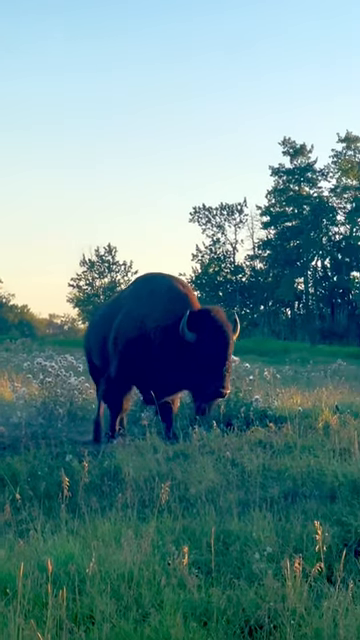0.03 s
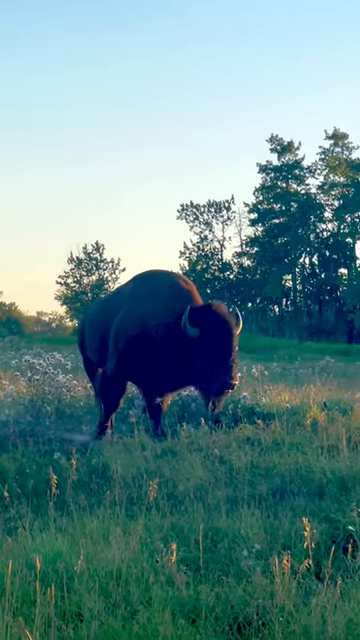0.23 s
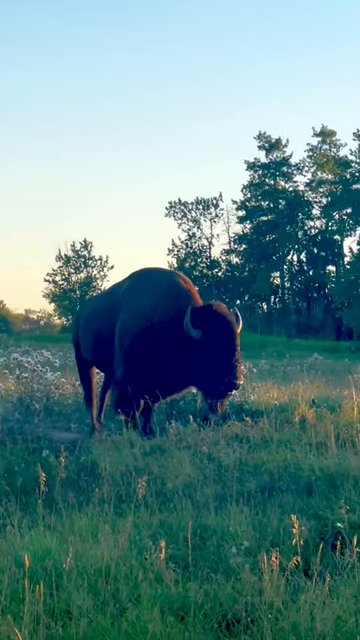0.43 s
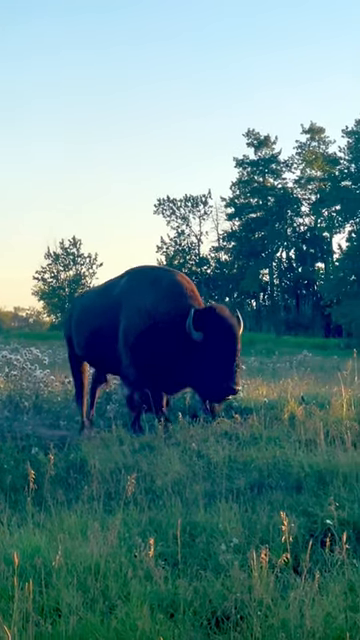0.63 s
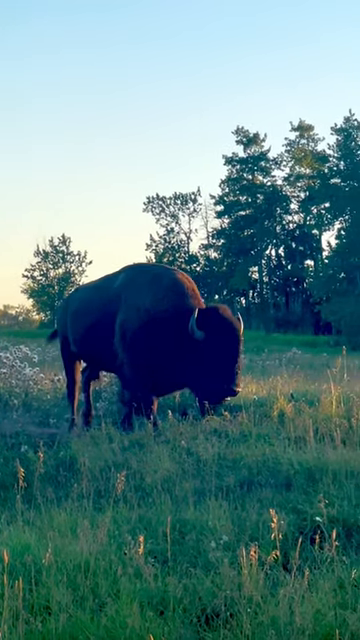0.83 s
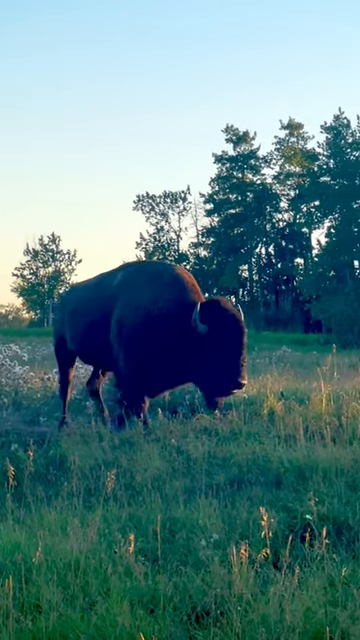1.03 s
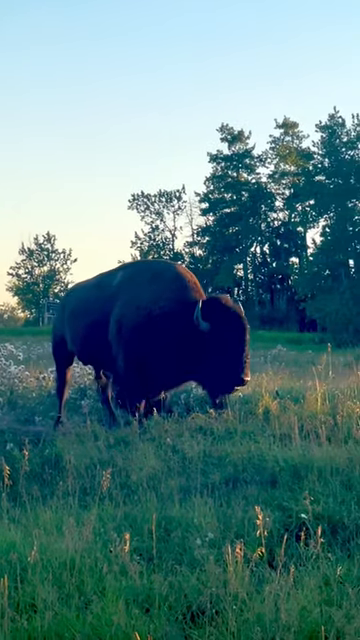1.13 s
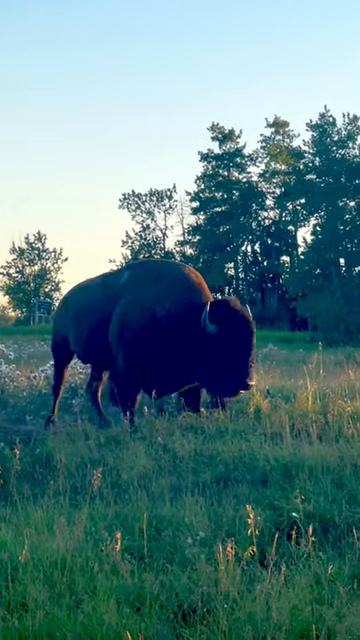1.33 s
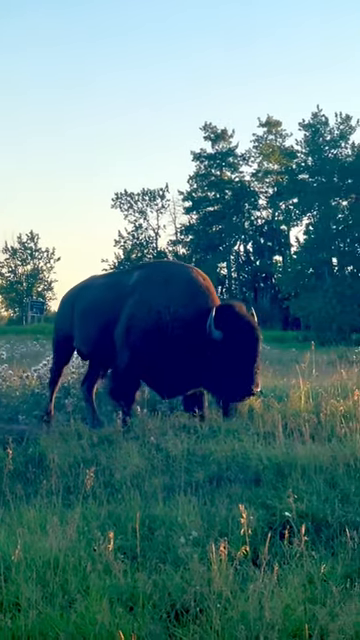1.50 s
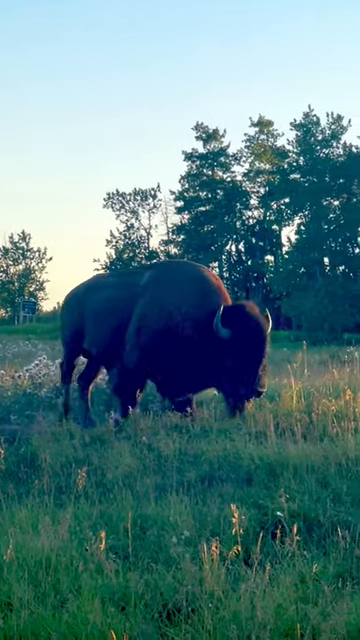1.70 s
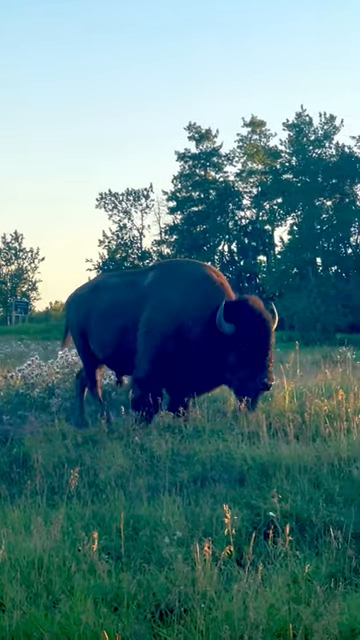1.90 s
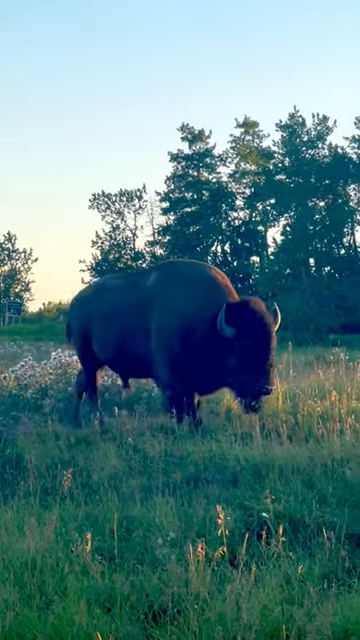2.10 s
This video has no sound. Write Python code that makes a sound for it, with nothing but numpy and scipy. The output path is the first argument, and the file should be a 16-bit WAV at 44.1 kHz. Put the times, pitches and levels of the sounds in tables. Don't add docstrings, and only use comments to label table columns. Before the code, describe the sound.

A bison bellows close by, a deep, rough, throaty growl pulsing fast in an open meadow.

```python
import sys
import numpy as np
from scipy import signal
from scipy.fft import rfft, irfft, next_fast_len
from scipy.io import wavfile
from scipy.ndimage import map_coordinates

SR = 44100
rng = np.random.default_rng(int(sys.argv[2]) if len(sys.argv) > 2 else 0)


def store_wav(level_fs):
    pcm = np.round(np.clip(np.atleast_2d(level_fs), -1, 1) * 32767)
    wavfile.write(sys.argv[1], SR, pcm.T.astype(np.int16))


def natural_amplitude(level_db):
    exponent = np.asarray(level_db, float) / 20
    return 10 ** exponent


N = 94815

# frequency in Hz, level in dB per Hz.
HUM_HZ_DB = [(25, -28), (60, -3), (160, -5), (520, -10.5), (980, -17.5), (2000, -29.5), (3000, -46.5),
             (8000, -61)]
# frequency in Hz, level in dB.
RUMBLE_HZ_DB = [(20, -53.5), (45, 10.5), (95, 3), (160, 7.5), (260, -36.5)]
# time in seconds, buzz in dB.
BUZZ_S_DB = [(0, -67), (.06, -71.5), (.17, -59), (.25, -68), (.37, -59.5), (.47, -69), (.6, -55.5),
             (.68, -68.5), (1.1, -75), (1.3, -66), (1.45, -70), (1.62, -85.5), (1.8, -79), (1.91, -66.5),
             (1.98, -77), (2.12, -59), (2.15, -58)]
# frequency in Hz, level in dB.
WING_HZ_DB = [(3000, -43.5), (6000, -38.5), (7800, -24), (8500, -4), (9300, -13), (10400, -2),
              (11300, -11.5), (12200, -24.5)]
# centre in Hz, width in Hz, level in dB.
CRICKET_WING = [(3880, 460, -8), (7100, 710, -11), (2800, 220, -16)]
# time in seconds, scrapes done.
SCRAPES_S_COUNT = [(.005, 0), (.25, 6), (1.59, 37), (1.96, 45), (2.195, 50)]
# time in seconds, level in dB.
CRICKET_S_DB = [(0, -79), (.4, -80), (1.5, -84), (2.15, -85)]
# centre in seconds, length in seconds, level in dB.
SWISHES = [
    (1.673, 0.0079, -75),
    (1.91, 0.014, -79.5),
    (2.143, 0.052, -65),
]
# frequency in Hz, level in dB.
GRASS_HZ_DB = [(1500, -19), (3000, 1), (4500, 3.5), (6000, 1), (8000, -28), (12000, -35)]

# time in seconds, cycles done.
CYCLES_S_COUNT = [(.177, 0), (.2877, 3), (.414, 7), (.5576, 11), (.778, 17), (1.042, 24), (1.195, 28),
                  (1.359, 32), (1.49, 35)]
# time in seconds, level in dB.
EFFORT_S_DB = [
    (.16, -76),
    (.2, -43.5),
    (.29, -53),
    (.33, -33.5),
    (.42, -29),
    (.6, -31.5),
    (1.1, -34),
    (1.38, -38.5),
    (1.5, -60.5),
]
# time in seconds, slap sharpness in dB, air in dB.
EDGE_S_DB = [(.17, -3, -37), (.25, -15, -40), (.29, 4.5, -2.5), (.35, -2.5, 6), (.41, -4, 6.5), (.5, -2, 4),
             (.8, -0.5, 0), (.98, -6, 2.3), (1.15, -2, -3), (1.45, -6, 6)]
ACCENTS_DB = {0: 7.5, 4: 8.3, 5: -4, 6: -10.5, 7: 3.6, 8: 6.6, 9: 2.1, 10: -3.5, 11: 0.57, 12: 1.3, 17: 6.5,
              19: -1.2, 20: 1.4, 21: 9, 22: 5, 23: -10, 24: 8.5, 25: 4.3, 26: 5.3, 29: -5, 30: 3, 32: 3.5,
              33: -15, 34: -22}
THUMPS_DB = {4: 2.2, 5: -0.5, 6: 2.1, 7: -3, 8: .3, 9: 0.58, 10: 3.6, 11: 2.3, 12: 0.97, 13: 4.3, 14: .3,
             15: -1.5, 16: -6, 17: 2.5, 18: -1.5, 19: .3, 20: -.3, 21: 6.4, 22: .3, 23: 2.3, 24: .3, 25: .3,
             26: .3, 27: 1.6, 28: 1.5, 29: -1.5, 30: 1.5, 31: -1.3, 32: 0.92, 33: -1.5}
GUSTS_DB = {4: -5, 5: 1.5, 6: 2, 7: 4, 9: -4, 10: -9, 11: 1.5, 14: 1.5, 15: 3, 16: -1.5, 19: -1, 20: -4, 22:
            3, 23: 2.5, 24: -3, 26: 2.5, 27: -3, 28: -4, 29: -4, 32: 2.5}
# time in seconds, level in dB.
ECHO_S_DB = [(.85, -1), (.95, -13.5), (1.2, -2), (1.45, -4)]
# cycle, shift in cycles, level in dB.
ODD_ECHOES = [(4, 0, -6), (5, -.02, 3), (6, -.25, 2), (7, -.1, 0), (8, -.09, 3), (9, .04, 2), (10, 0, -9),
              (11, -.04, 4), (13, 0, 2), (14, -.1, -3), (15, 0, 3), (16, -.1, -4), (17, -.05, 7),
              (19, .07, 0), (28, -.1, 2), (29, -.06, 9), (32, 0, 2)]
# time in seconds, centre in Hz.
CHEST_S_HZ = [(.2, 156.4), (.33, 158.7), (.42, 193.7), (.55, 200.5), (.65, 206.5), (.8, 194.2),
              (1.0, 194.5), (1.2, 174.3), (1.45, 180)]
# centre in Hz, width in Hz, level in dB.
FLANK_MODES = [(58, 25.6, -13.5), (85, 71, -19), (127.7, 16.5, -7)]
# time in seconds, centre in Hz, level in dB.
NOSE_S_HZ_DB = [(.3, 456, 0), (.55, 460, -1), (.7, 473.5, 6), (1.0, 472.6, 3.5), (1.15, 496, 5.5),
                (1.45, 515, 0)]
# first Hz, last Hz, width in Hz, first dB, last dB.
THROAT_MODES = [(678.4, 780, 51, -1.5, -7), (993, 960, 77, 2, -2.5), (1210, 1224, 64.4, 1.4, 2),
                (1531, 1593, 105, -3.5, -4), (1820, 3200, 62, -7.5, -21), (2064, 890, 60, -10, -30.5),
                (2620, 940, 100, -43.5, -25.5)]
# frequency in Hz, level in dB.
AIR_HZ_DB = [(1500, 15), (2500, -2.5), (3500, -2), (5200, -5), (7000, -19), (9000, -6), (10500, -2),
             (13000, -30)]
# time in seconds, share of air in puffs.
PULSED_S_SHARE = [(.29, 1.2), (.33, .2), (.45, .3), (.6, .5), (1.2, .55), (1.3, .2)]
# centre in Hz, width in Hz, level in dB.
PARTING_MODES = [(373, 110, 2.5), (570, 200, 1.5), (970, 110, -4)]

# frequency in Hz, left lead in radians.
PHASE_HZ_RAD = [(0, 0), (600, -.33), (2700, .55), (4500, 1.15), (5300, 5.6), (8300, 9.15), (9400, 9.6),
                (11900, 12.57)]
# frequency in Hz, left minus right in dB.
PORT_HZ_DB = [(300, 0), (550, -1), (800, -3), (1020, -4.8), (1250, -2.7), (1550, 0)]

HUM_DB, RUMBLE_DB = -57.5, -59.5
STROKE_HZ, STROKE_DEPTH = 520, 0.35
CRICKET_DUTY = 1.9
FIELD_T60_S, FIELD_DB, APART_DB = 0.48, -16.5, -30
ECHO_AT_CYCLE, ECHO_DB, ECHO_SPREAD_DB = .56, -3.5, 1.2
CHEST_WIDTH_HZ, CHEST_LAG_S, CHEST_ECHO, CHEST_ROUGH = 51.3, .003, 0.5, .3
FLANK_DB, FLANK_GROWS = -38.5, 0.36
NOSE_WIDTH_HZ, NOSE_DB, RING_DB = 58, -56, -1
THROAT_DB, THROAT_ROUGH_DB, SLAP_T60_S = -40.5, -7, 0.023
SLAP_CRACK, CRACK_HZ, GRIT_DB, HUSH = .8, 1120, 7, .8
SOFT_TOP_HZ, MOUTH_START_S, MOUTH_END_S = 1200, 0.54, 1.2
AIR_DB, PUFF_S, AIR_STEADY = -56.5, 0.0032, 0.41
SIGH_S, SIGH_LENGTH_S, SIGH_DB = 1.47, 0.03, -61
SPIT_S, SPIT_LENGTH_S, SPIT_DB, SPIT_HZ = 1.03, .12, -72, 10600
PARTING_DB = -69
TOP_HZ, ROLL_OFF_HZ = 13050, 11630


def unit(x):
    return x / np.sqrt(np.mean(x ** 2) + 1e-20)


def along(points, hz):
    f, v = np.transpose(points)
    return np.interp(np.log(hz + 1), np.log(f + 1), v)


def curves(rows):
    s, *cols = np.transpose(rows)
    return [np.interp(np.arange(N) / SR, s, c) for c in cols]


def wobble(rate_hz):
    knots = rng.standard_normal(int(N * rate_hz / SR) + 4)
    return map_coordinates(knots, [np.arange(N) * rate_hz / SR])


def bump(at_s, length_s):
    return np.exp(-((np.arange(N) / SR - at_s) / length_s) ** 2 / 2)


def filtered(x, response):
    m = next_fast_len(N + SR // 2)
    return irfft(rfft(x, m) * response(np.fft.rfftfreq(m, 1 / SR)), m)[..., :N]


def tube(modes):
    def response(f):
        total = 0
        for k, (centre, width, db) in enumerate(modes):
            loss = 1j * f * width
            total = total + (-1) ** k * natural_amplitude(db) * loss / (centre ** 2 - f * f + loss)
        return total
    return response


def noise(spectrum):
    return unit(filtered(rng.standard_normal(N), lambda hz: natural_amplitude(along(spectrum, hz))))


def train(times_s, sizes):
    return np.bincount(np.round(times_s * SR).astype(int), sizes, N)[:N]


def decay(x, seconds):
    return filtered(x, lambda f: seconds * SR / (1 + 2j * np.pi * f * seconds))


def glide(x, hz, width_hz):
    turn = np.exp(2j * np.pi * np.cumsum(hz) / SR)
    pole = np.exp(-np.pi * width_hz / SR)
    rung = np.real(turn * signal.lfilter([1], [1, -2 * pole, pole ** 2], x / turn))

    def skirts(f):
        edge = 1j * f / hz.mean()
        return (edge / (.3 + edge) / (1 + edge / 3)) ** 2
    return unit(filtered(rung, skirts))


def far_hum():
    hum = natural_amplitude(HUM_DB + 0.4 * wobble(3)) * noise(HUM_HZ_DB)
    return hum + natural_amplitude(RUMBLE_DB + 2.7 * wobble(3.3)) * noise(RUMBLE_HZ_DB)


def port_hiss():
    spectrum = [(300, -27.5), (1000, -7.0), (9000, -19), (12000, -50.5)]
    return natural_amplitude(-86) * np.array([noise(spectrum) for _ in range(2)])


def katydid():
    rate_hz = STROKE_HZ * (1 + 0.0522 * wobble(33))
    strokes = 1 + STROKE_DEPTH * np.sin(2 * np.pi * np.cumsum(rate_hz) / SR)
    buzz = unit(natural_amplitude(0.36 * wobble(26.0)) * strokes ** 2 * noise(WING_HZ_DB))
    return natural_amplitude(curves(BUZZ_S_DB)[0]) * buzz


def cricket():
    gate = np.cos(np.pi * curves(SCRAPES_S_COUNT)[0]) ** 2
    scrapes = gate ** CRICKET_DUTY * rng.standard_normal(N)
    return natural_amplitude(curves(CRICKET_S_DB)[0] + wobble(2.1)) * unit(filtered(scrapes, tube(CRICKET_WING)))


def grass():
    out = np.zeros(N)
    for at_s, length_s, db in SWISHES:
        stems = unit(natural_amplitude(2.3 * wobble(300)) * noise(GRASS_HZ_DB))
        out += natural_amplitude(db) * bump(at_s, length_s) * stems
    return out


def field(x):
    t = np.arange(SR // 2) / SR
    tail = rng.standard_normal(len(t)) * natural_amplitude(-60 * t / FIELD_T60_S) * (1 - np.exp(-t / 0.012))
    answer = signal.fftconvolve(x, tail / np.linalg.norm(tail))[:N]
    return filtered(answer, lambda f: 1 / (1 + 1j * f / 2500))


def per_cycle(table, count):
    return np.array([table.get(i, 0) for i in range(count)])


def fold_slaps():
    s, done = np.transpose(CYCLES_S_COUNT)
    k = np.arange(done[-1])
    odd = {int(round(c)): (shift, db) for c, shift, db in ODD_ECHOES}
    shift, odd_db = np.transpose([odd.get(int(i), (0, 0)) for i in k])
    jitter = 0.013 * rng.standard_normal(len(k))
    main_s = np.interp(k, done, s)
    echo_s = np.interp(k + ECHO_AT_CYCLE + shift + jitter, done, s)
    echo_db = ECHO_DB + odd_db + np.interp(echo_s, *np.transpose(ECHO_S_DB))
    return main_s, echo_s, echo_db


def chest_drive(main_s, echo_s):
    count = len(main_s)
    main_db = per_cycle(THUMPS_DB, count) + .5 * rng.standard_normal(count)
    lead_s = np.interp(main_s, [1.1, 1.35], [0, .006])
    echo_size = CHEST_ECHO * np.interp(echo_s, [1.1, 1.3], [1, .4]) * natural_amplitude(2 * rng.standard_normal(count))
    push = train(main_s + CHEST_LAG_S - lead_s, natural_amplitude(main_db))
    push = push + train(echo_s + CHEST_LAG_S, echo_size)
    rough = unit(decay(push, 0.019) * rng.standard_normal(N))
    return unit(push - push.mean()) + CHEST_ROUGH * rough


def chest_and_flank(drive, effort_db, loud_db):
    dark = lambda f: 1 / (1 + (f / 250) ** 10) + 0.68
    chest = filtered(glide(drive, *curves(CHEST_S_HZ), CHEST_WIDTH_HZ), dark)
    flank = filtered(drive, lambda f: tube(FLANK_MODES)(f) * dark(f))
    return natural_amplitude(effort_db) * unit(chest) + natural_amplitude(FLANK_DB + FLANK_GROWS * loud_db) * unit(flank)


def throat_shape(e):
    modes = tube([(a + e * (b - a), w, p + e * (q - p)) for a, b, w, p, q in THROAT_MODES])
    steep = lambda f: (f / 600) ** 6 / (1 + (f / 600) ** 6) / (1 + (f / 2600) ** 4)
    return lambda f: modes(f) * steep(f)


def mouth_stages():
    late = curves([(MOUTH_START_S, 0), (MOUTH_END_S, 1)])[0]
    return [(np.sqrt(np.clip(1 - abs(late - e) * 3, 0, 1)), e) for e in np.arange(4) / 3]


def nose(drive, sharp_db, stages):
    hz, db = curves(NOSE_S_HZ_DB)
    hum = natural_amplitude(db) * glide(drive + .8 * rng.standard_normal(N), hz, NOSE_WIDTH_HZ)
    rings = np.zeros(N)
    for weight, e in stages:
        for first_hz, last_hz, *_ in THROAT_MODES[:2]:
            mode = tube([(first_hz + e * (last_hz - first_hz), 45, 0)])
            rings += weight * filtered(drive, lambda f: mode(f) ** 2)
    return hum + natural_amplitude(RING_DB + sharp_db) * unit(rings)


def throat(main_s, echo_s, echo_db, loud_db, air_db, stages):
    count = len(main_s)
    accent_db = per_cycle(ACCENTS_DB, count)
    slaps = train(main_s, natural_amplitude(accent_db + .5 * rng.standard_normal(count)))
    slaps = slaps + train(echo_s, natural_amplitude(echo_db + ECHO_SPREAD_DB * rng.standard_normal(count)))
    crack = decay(train(main_s, natural_amplitude(accent_db)), SLAP_T60_S / np.log(1000))
    crack = unit(crack * np.sign(rng.standard_normal(N)))
    crack = filtered(crack, tube([(CRACK_HZ, 900, 3)]))
    rough = natural_amplitude(THROAT_ROUGH_DB + 2.2 * air_db + 0.95 * wobble(58.77))
    grit = unit(rng.standard_normal(N) * natural_amplitude(GRIT_DB * wobble(500)))
    hush = 1 - (HUSH * curves(CYCLES_S_COUNT)[0]) % 1
    burst = unit(unit(slaps) + SLAP_CRACK * crack) + rough * grit * hush
    firm = np.clip(1 + loud_db / 14, 0, 1)
    soft = filtered(burst, lambda f: 1 / (1 + 1j * f / SOFT_TOP_HZ) ** 2)
    burst = firm * burst + (1 - firm) * soft
    return unit(sum(weight * filtered(burst, throat_shape(e)) for weight, e in stages))


def breath(puffs):
    swell = unit(filtered(puffs, lambda f: np.exp(-(2 * np.pi * f * PUFF_S) ** 2 / 2)))
    patches = np.zeros(N)
    for hz in (1833, 2690, 3460, 4050, 5290, 6900, 8300, 10920):
        patches += natural_amplitude(3.57 * wobble(45.12)) * filtered(noise(AIR_HZ_DB), tube([(hz, hz / 9, 0)]))
    flow = curves(PULSED_S_SHARE)[0] * swell + AIR_STEADY * natural_amplitude(4.5 * wobble(91.12))
    return unit(flow * patches)


def spit(puffs):
    ticks = decay(puffs, .0015) * rng.standard_normal(N)
    wet = unit(filtered(ticks, tube([(SPIT_HZ, 2500, 0), (5200, 1200, -4)])))
    return natural_amplitude(SPIT_DB) * bump(SPIT_S, SPIT_LENGTH_S) * wet


def sigh():
    release = unit(filtered(rng.standard_normal(N), throat_shape(1)))
    return natural_amplitude(SIGH_DB) * bump(SIGH_S, SIGH_LENGTH_S) * release


def folds_part(main_s):
    tick = decay(train(main_s[:1], [1.]), 0.0044) * rng.standard_normal(N)
    return natural_amplitude(PARTING_DB) * unit(filtered(tick, tube(PARTING_MODES)))


def bellow():
    main_s, echo_s, echo_db = fold_slaps()
    effort_db = curves(EFFORT_S_DB)[0]
    loud_db = effort_db - effort_db.max()
    sharp_db, air_db = curves(EDGE_S_DB)
    start_s, end_s = CYCLES_S_COUNT[0][0], CYCLES_S_COUNT[-1][0]
    on = curves([(start_s - .002, 0), (start_s, 1), (end_s, 1), (end_s + 0.089, 0)])[0]
    stages = mouth_stages()
    drive = chest_drive(main_s, echo_s)
    gust_db = per_cycle(GUSTS_DB, len(main_s)) + .8 * rng.standard_normal(len(main_s))
    puffs = train(main_s, natural_amplitude(gust_db)) + 0.5 * train(echo_s, natural_amplitude(echo_db))
    voice = chest_and_flank(drive, effort_db, loud_db)
    voice = voice + natural_amplitude(NOSE_DB + 0.39 * loud_db) * nose(drive, sharp_db, stages)
    ringing = throat(main_s, echo_s, echo_db, loud_db, air_db, stages)
    voice = voice + natural_amplitude(THROAT_DB + 0.43 * loud_db + sharp_db) * ringing
    voice = voice + natural_amplitude(AIR_DB + .5 * loud_db + air_db) * breath(puffs) + spit(puffs)
    return folds_part(main_s) + sigh() + on * voice


def scene():
    call = bellow()
    mono = far_hum() + katydid() + cricket() + grass() + natural_amplitude(FIELD_DB) * field(call) + call
    apart = natural_amplitude(APART_DB) * filtered(field(call), lambda f: (f / 300) ** 4 / (1 + (f / 300) ** 4))
    return np.array([mono + apart, mono - apart]) + port_hiss()


def top_cut(x):
    return signal.sosfilt(signal.butter(12, 13010, fs=SR, output="sos"), x)


def record(dry):
    side = np.array([[.5], [-.5]])

    def ports(f):
        tilt = natural_amplitude(side * along(PORT_HZ_DB, f))
        phase = np.exp(1j * side * np.interp(f, *np.transpose(PHASE_HZ_RAD)))
        return tilt * phase * (f < TOP_HZ) / (1 + (f / ROLL_OFF_HZ) ** 30)
    return top_cut(filtered(dry, ports))


dry = scene()
out = record(dry)
store_wav(out)
```